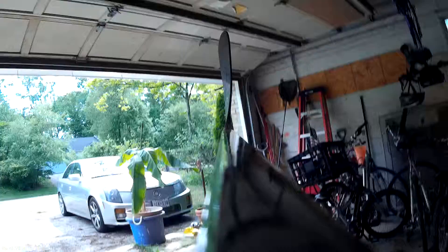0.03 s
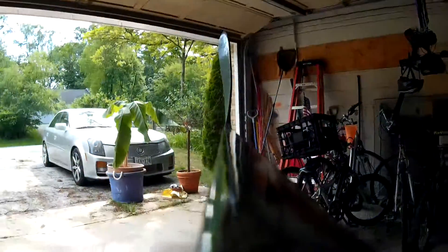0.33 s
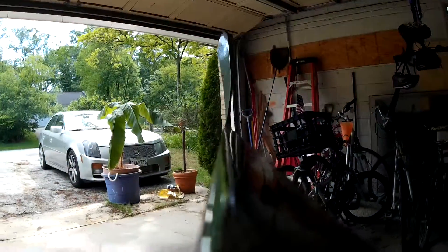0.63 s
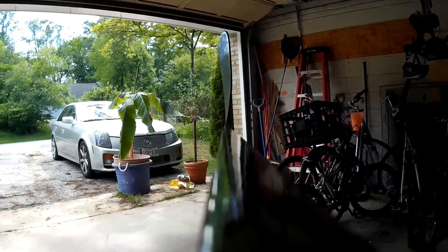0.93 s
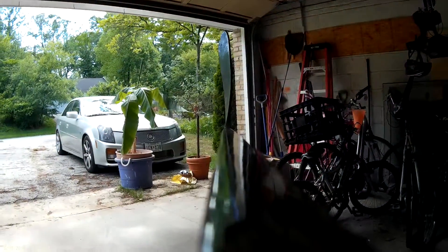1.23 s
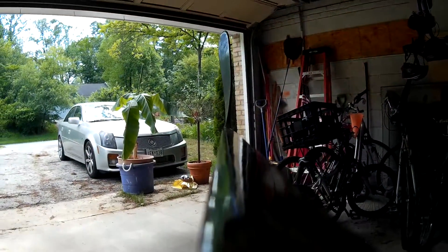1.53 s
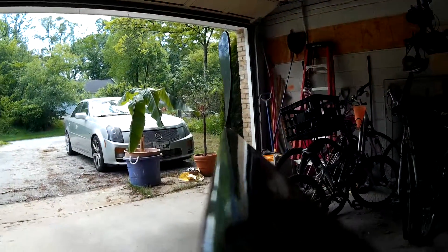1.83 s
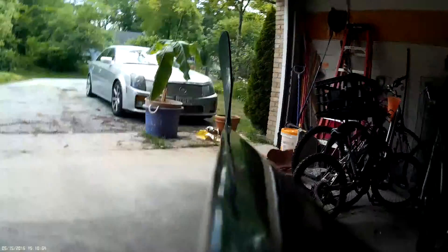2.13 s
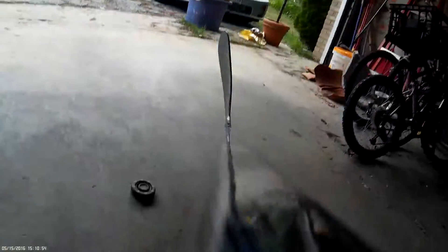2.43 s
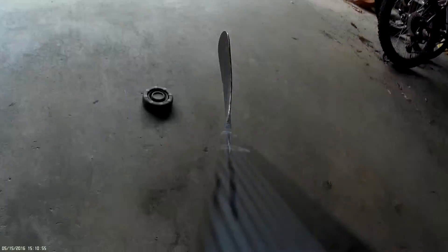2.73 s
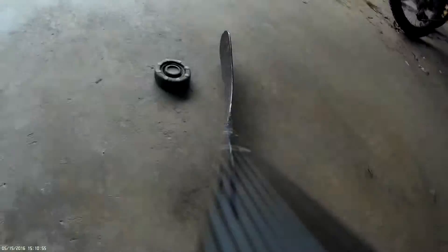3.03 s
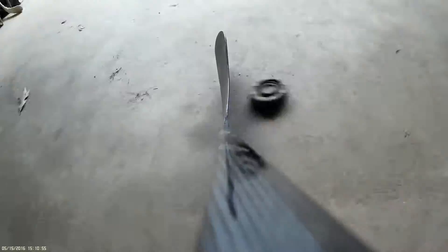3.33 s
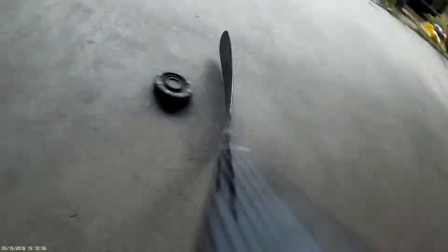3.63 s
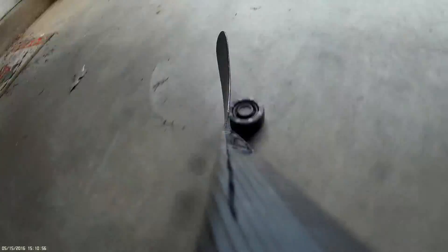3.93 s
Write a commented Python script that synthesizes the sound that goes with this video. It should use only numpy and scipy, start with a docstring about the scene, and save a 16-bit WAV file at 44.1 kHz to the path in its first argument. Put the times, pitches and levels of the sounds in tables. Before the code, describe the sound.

Hockey stick slaps and scrapes a puck on concrete after quiet handling in a garage.

```python
"""An open concrete garage, heard from a small camera fixed to the shaft of a hockey stick.
A steady outdoor hush comes first, with hands sliding, tapping and creaking right by the microphone.
From about three seconds the blade slaps and scrapes the floor and knocks a puck about.
The shaft carries each blow straight to the microphone, which overloads, and the garage rings on."""
import sys
import numpy as np
from scipy import signal
from scipy.fft import rfft, irfft
from scipy.io import wavfile

SR = 44100
rng = np.random.default_rng(int(sys.argv[2]) if len(sys.argv) > 2 else 0)


def int16_out(signal):
    """Quantize to a 16-bit WAV file."""
    q = np.round(np.clip(np.atleast_2d(signal).T, -1, 1) * 32767)
    wavfile.write(sys.argv[1], SR, q.astype(np.int16))


N = 176400
TIME = np.arange(N) / SR


def from_db(db):
    """Decibels to gain."""
    return 10 ** (np.asarray(db) / 20)


def unit_rms(x):
    """Scale to unit rms."""
    return x / np.sqrt(np.mean(x ** 2) + 1e-20)


def curve(rows):
    """Gain through points of seconds and dB, held level beyond both ends."""
    return from_db(np.interp(TIME, *np.transpose(rows)))


def dying(start, t60, hold=0):
    """Envelope that jumps to 1, holds, then falls 60 dB in t60 seconds."""
    age = TIME - start
    return (age >= 0) * from_db(-60 * np.clip((age - hold) / t60, 0, 4))


def cut(x, hz, kind="low"):
    """Second-order low- or high-pass."""
    return signal.sosfilt(signal.butter(2, hz, kind, fs=SR, output="sos"), x)


def shelf(x, hz, db):
    """Lift or lower the treble above a corner frequency."""
    return x + (from_db(db) - 1) * signal.lfilter(*signal.butter(1, hz, "high", fs=SR), x)


def low_noise(hz):
    """Low-passed noise of unit rms."""
    return unit_rms(cut(rng.standard_normal(N), hz))


def coloured(spectrum):
    """Noise of unit rms, shaped by points of Hz and dB."""
    hz, db = np.transpose(spectrum)
    bins = np.maximum(np.fft.rfftfreq(N, 1 / SR), 1)
    gains = from_db(np.interp(np.log(bins), np.log(hz), db))
    return unit_rms(irfft(rfft(rng.standard_normal(N)) * gains, N))


def resonate(force, modes):
    """Parallel resonances with notches between them; white noise keeps about its level."""
    out, power = 0, 0
    for hz, width, db in modes:
        radius = np.exp(-np.pi * width / SR)
        gain = from_db(db) * (1 - radius ** 2) / 2
        poles = [1, -2 * radius * np.cos(2 * np.pi * hz / SR), radius ** 2]
        out = out + signal.lfilter([gain, 0, -gain], poles, force + 1e-18)
        power += gain * from_db(db)
    return out / np.sqrt(power)


def grit(grains_per_s=3000, spread_db=0.5):
    """Dense clicks of uneven size, from grains of concrete."""
    sizes = from_db(spread_db * np.minimum(rng.exponential(1, N), 4)) * rng.choice([-1, 1], N)
    return unit_rms(sizes * (rng.random(N) < grains_per_s / SR))


def knocks(rows, modes, hold_s=0):
    """Each contact sets off a fast-dying chatter in the stick, with its own brightness."""
    chatter = rng.standard_normal(N)
    force = sum(from_db(db) * dying(start, t60, hold_s) * shelf(chatter, 2820, treble_db)
                for start, db, t60, treble_db in rows)
    return resonate(force, modes)


# The air outside, heard from within the garage. Each row: frequency in Hz, relative level in dB.
HUSH_SPECTRUM = [(25, -4.5), (300, -5), (520, -2.5), (1100, -2), (1900, -0.5), (2700, -11.5), (4000, -19),
                 (6000, -29), (12000, -35), (16000, -50)]
# Its one soft swell. Each row: time in seconds, gain in dB.
HUSH_RISE = [(1.05, -.5), (1.19, 1.5), (1.28, 0)]

def hush():
    """A steady wash of outdoor noise comes in through the open garage."""
    return from_db(-37.5) * curve(HUSH_RISE) * coloured(HUSH_SPECTRUM)


# Wind right on the microphone. Each row: time in seconds, level in dB.
BUFFETING = [(3.0, -81), (3.18, -50), (3.33, -28.5), (3.55, -51), (4.0, -38)]

def draught():
    """Air buffets the swinging microphone into a low rumble."""
    return curve(BUFFETING) * low_noise(hz=86)


# The tail off the concrete all around. Each row: frequency in Hz, relative level in dB.
GARAGE_SPECTRUM = [(40, -11), (300, -15.5), (550, -8), (1400, -1), (1850, 2), (2550, -11.5), (4000, -15.5),
                   (6500, -33.5), (15000, -50)]

def garage(contacts, t60=1.25, build_s=0.0023):
    """Blade, puck and floor radiate a broad clack; the room returns a diffuse mid-range tail."""
    clack = np.abs(contacts) * rng.standard_normal(N)
    tail = coloured(GARAGE_SPECTRUM) * dying(0, t60) * (1 - np.exp(-TIME / build_s))
    return from_db(-26) * signal.fftconvolve(clack, tail / np.sqrt(np.sum(tail ** 2)))[:N]


def squeal(span_s=(0.24, 0.47), glide_hz=(8300, 12700)):
    """A hand runs along the shaft: a thin band of friction hiss swells, glides upward and fades."""
    waver = low_noise(hz=1300)
    swell = np.sin(np.interp(TIME, span_s, [0, np.pi]))
    phase = 2 * np.pi * np.cumsum(np.interp(TIME, span_s, glide_hz)) / SR
    return from_db(-49.5) * swell * unit_rms(waver * np.sin(phase))


# The grip creaking, close up. Each row: start and length in seconds, pitch in Hz, level in dB.
GRIP_CREAKS = [(0.554, 0.018, 2150, -32), (0.566, .095, 2100, -34.5), (1.513, 0.024, 2800, -29),
               (1.534, .02, 3020, -33)]

def creaks(slips_per_s=450, jitter=0.38, width_hz=600):
    """The grip sticks and slips unevenly, ringing a broad resonance and its overtone."""
    out = np.zeros(N)
    for start, length, hz, db in GRIP_CREAKS:
        rate = slips_per_s * np.exp(jitter * low_noise(hz=200))
        slips = np.diff(np.floor(np.cumsum(rate) / SR), prepend=0)
        ring = unit_rms(resonate(slips, [(hz, width_hz, 0), (2.5 * hz, width_hz, -14)]))
        swell = np.sin(np.pi * np.clip((TIME - start) / length, 0, 1))
        out += from_db(db) * swell * ring
    return cut(out, hz=7000)


# The shaft ringing under the microphone. Each row: frequency and width in Hz, relative level in dB.
SHAFT_MODES = [(966, 87, -0.5), (1985, 180, -2.5), (2300, 290, -5.5), (2660, 250, -7.5), (3520, 470, -7.5),
               (4130, 400, -4), (4516, 150, -5), (5540, 240, -13), (6160, 570, -16.5), (7450, 1100, -18.5),
               (8540, 850, -13), (10530, 670, -17), (11870, 480, -10), (13600, 750, -19)]
# Hands passing close by. Each row: start, peak and end in seconds, relative level and treble in dB.
HAND_SLIDES = [(.06, .31, .475, -41, 0), (.545, .61, .72, -35.5, -4), (.69, .78, .85, -42, -4),
               (1.145, 1.168, 1.195, -48, 1), (1.47, 1.53, 1.58, -39, -18), (1.53, 1.61, 1.67, -36, -8),
               (1.64, 1.77, 1.83, -45, -6), (1.81, 1.86, 1.97, -42, -6), (1.93, 2.02, 2.11, -39, -1),
               (2.06, 2.15, 2.26, -31.5, 6), (2.11, 2.21, 2.42, -37.5, 13), (2.91, 2.96, 2.99, -39, -4)]

def slides(edge_s=0.016, sag_db=10.5, grain_db=1.4, detune=0.008, lift_db=3, dull_db=8):
    """Friction swells and fades with each slide, and each grip detunes the shaft a little."""
    rub = cut(rng.standard_normal(N), 1400, "high") * from_db(grain_db * low_noise(hz=110))
    out = np.zeros(N)
    for start, peak, end, db, treble_db in HAND_SLIDES:
        during = (TIME > start) & (TIME < end)
        t = TIME[during]
        gripped = [(hz * (1 + detune * rng.standard_normal()), width, mode_db)
                   for hz, width, mode_db in SHAFT_MODES]
        touch = np.clip(np.minimum(t - start, end - t) / edge_s, 0, 1)
        swell = from_db(db + lift_db - np.interp(t, [start, peak, end], [sag_db, 0, sag_db]))
        ring = resonate(rub[during], gripped)
        out[during] += touch * swell * shelf(ring, 7400, treble_db - dull_db)
    return cut(out, hz=13600)


# Taps near the microphone. Each row: start in seconds, level in dB, t60 in seconds, treble in dB.
HAND_TAPS = [(.091, -30, 0.015, 0.5), (.1313, -21, 0.034, -6.5), (.1465, -27.5, 0.039, -8),
             (.1795, -26.5, 0.04, -6), (.1865, -21, 0.01, -3.5), (.5895, -18.5, 0.0084, -21),
             (2.002, -13.5, 0.017, -20), (2.0092, -6, 0.012, -2.5), (2.014, -18.5, 0.074, -16),
             (2.031, -12, 0.027, -6), (2.0695, -16.5, 0.043, -3), (2.4356, -29, 0.011, -0.5),
             (2.5334, -32, 0.033, -12)]

def taps():
    """Light touches of the hands ring the shaft briefly."""
    return cut(knocks(HAND_TAPS, SHAFT_MODES), hz=10100)


# The whole stick, from floor to microphone. Each row: frequency and width in Hz, relative level in dB.
STICK_MODES = [(406, 450, -5), (852, 140, 6.5), (1188, 140, 2), (1540, 760, 4.5), (1903, 370, 5.5),
               (2358, 220, 0), (2638, 75, 1), (2954, 93, -0.5), (3110, 230, -0.5), (3450, 380, -7),
               (4050, 740, -6.5), (5940, 780, -11), (7720, 850, -10), (8650, 820, -11), (12400, 3600, -10)]
# Puck and stick moving, down at the floor. Each row: time in seconds, level in dB.
ROLL_LEVEL = [(2.7, -51), (2.96, -32), (3.32, -37), (3.5, -36.5), (4.0, -50)]
# Single grains under the blade. Each entry: start in seconds.
GRIT_TICKS = [3.197, 3.236, 3.308, 3.337, 3.571, 3.588, 3.847, 3.857]

def rolling():
    """Faint grit under the rolling puck and a few sharp ticks come up through the stick."""
    bright_grit = unit_rms(cut(resonate(grit(), STICK_MODES), 5000, "high"))
    ticks = bright_grit * sum(dying(start, t60=0.0068) for start in GRIT_TICKS)
    roll = curve(ROLL_LEVEL) * cut(resonate(grit(), STICK_MODES), hz=2770)
    return roll + from_db(-30) * cut(ticks, hz=9600)


# The loose puck knocking dully on the floor. Each row: start in seconds, level in dB.
PUCK_TOUCHES = [(3.872, -15)]

def puck(hz=1770, t60=0.025):
    """A soft touch rings only the puck's one short mode."""
    return sum(from_db(db) * dying(start, t60) * np.sin(2 * np.pi * hz * (TIME - start))
               for start, db in PUCK_TOUCHES)


# Deep pulses under the heaviest blows. Each row: start in seconds, level in dB.
LOW_PULSES = [(3.122, -11), (3.386, -9), (3.622, -13), (3.698, -11), (3.908, -12)]

def low_pulses(hz=25, t60=0.11):
    """A brief, very low pulse follows each overloading blow."""
    return sum(from_db(db) * dying(start, t60) * np.sin(2 * np.pi * hz * (TIME - start))
               for start, db in LOW_PULSES)


# The dragging blade's resonances. Each row: frequency and width in Hz, relative level in dB.
BLADE_MODES = [(907, 93, 16), (1280, 440, 6), (1930, 720, 14.5), (2650, 480, 13), (3400, 500, -3),
               (4430, 430, -7)]
# Its pressure on the floor, at the far end of the shaft. Each row: time in seconds, level in dB.
SCRAPE_LEVEL = [(3.044, -64), (3.051, -13), (3.066, -6.5), (3.078, -17), (3.088, -9.5), (3.104, -9.5),
                (3.113, -10), (3.128, -26), (3.16, -48.5)]

def scrape():
    """Grains of concrete rattle the blade as it is dragged over them."""
    return curve(SCRAPE_LEVEL) * cut(resonate(grit(), BLADE_MODES), hz=9600)


# The blade taking weight on the floor. Each row: start in seconds, level in dB.
FLOOR_THUDS = [(3.115, 10.5), (3.38, 13), (3.692, 12.5), (3.895, 2.5)]
# The stick bending under the microphone. Each row: frequency in Hz, gain in dB, t60 in seconds.
BENDING_MODES = [(91.7, -4.5, .04), (157, -4, 0.027), (227, -6.5, 0.033)]

def flex(attack_s=0.0031):
    """The shaft thuds in low, heavily damped swings."""
    out = np.zeros(N)
    for start, db in FLOOR_THUDS:
        age = TIME - start
        attack = np.clip(age / attack_s, 0, 1)
        for hz, mode_db, t60 in BENDING_MODES:
            swing = np.sin(2 * np.pi * (hz * age + rng.random()))
            out += from_db(db + mode_db) * attack * dying(start, t60) * swing
    return out


# Hard blows on puck and floor, then small bounces, reaching the microphone straight up the shaft.
# Each row: start in seconds, level in dB, t60 in seconds, treble in dB.
BLADE_BLOWS = [(2.9812, 10, 0.029, -3), (3.0445, 7, 0.019, -4), (3.082, -5, 0.013, -3),
               (3.1145, 17, 0.023, -8.5), (3.135, -1.5, 0.013, 1), (3.1475, -6.5, 0.029, -4),
               (3.3743, 17.5, 0.028, -8), (3.398, 2.5, 0.027, -5), (3.6123, 16, 0.027, 1),
               (3.6737, 2, 0.03, 5), (3.6875, 14.5, .03, -3), (3.7065, -4.5, 0.033, -4.5),
               (3.8882, 17.5, 0.028, -2.5), (3.901, 8, 0.043, -11)]
SMALL_BOUNCES = [(3.0005, -4.5, 0.027, -2), (3.143, -8, 0.0044, 1), (3.287, -15.5, 0.019, -4),
                 (3.358, -21.5, 0.042, -59), (3.411, -14, 0.032, -9), (3.633, -10.5, 0.023, 2),
                 (3.733, -12, 0.0067, -33), (3.9215, 1, 0.0033, 2)]

def slaps(contact_s=0.0011):
    """The blade rings the stick: blows hold for the contact time, bounces die away at once."""
    blows = knocks(BLADE_BLOWS, STICK_MODES, contact_s)
    bounces = knocks(SMALL_BOUNCES, STICK_MODES)
    return cut(blows + bounces, hz=10300)


def scene():
    """Stick, puck, room and outdoor air at the one microphone on the shaft."""
    contacts = scrape() + slaps() + puck()
    handling = taps() + slides() + creaks() + squeal()
    play = contacts + garage(contacts) + flex() + low_pulses() + rolling()
    return (play + handling + hush() + draught())[None]


def record(dry, opens_s=0.072, ceiling=0.71, knee=6, top_hz=15900):
    """Loud peaks overload and flatten; the sound starts after a moment, without its highest treble."""
    clipped = dry / (1 + np.abs(dry / ceiling) ** knee) ** (1 / knee)
    low_pass = signal.firwin(161, top_hz, window="blackman", fs=SR)
    return signal.fftconvolve(clipped * (TIME >= opens_s), low_pass[None], "same")


dry = scene()
out = record(dry)
int16_out(out)
```